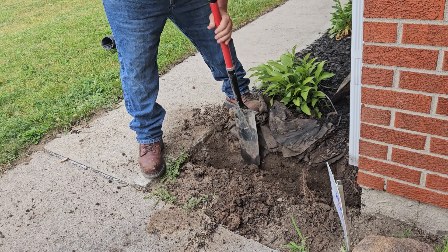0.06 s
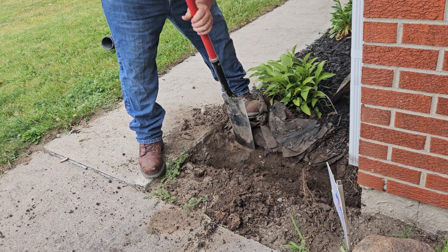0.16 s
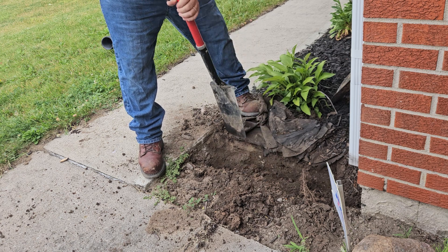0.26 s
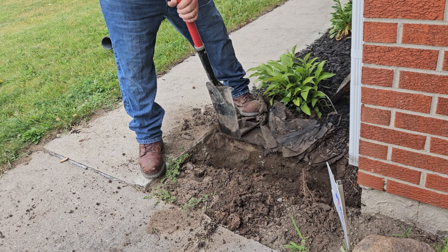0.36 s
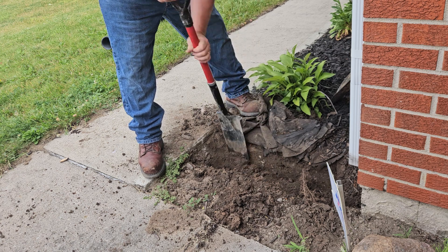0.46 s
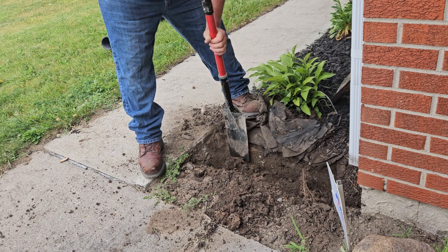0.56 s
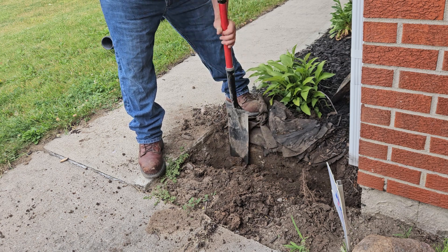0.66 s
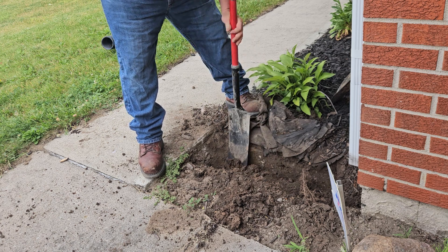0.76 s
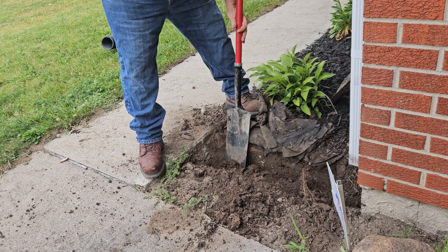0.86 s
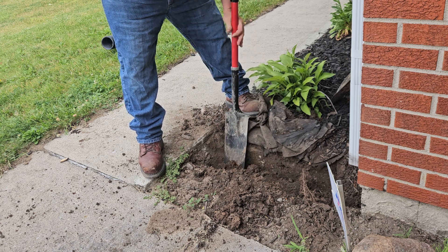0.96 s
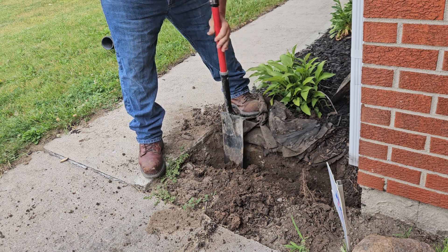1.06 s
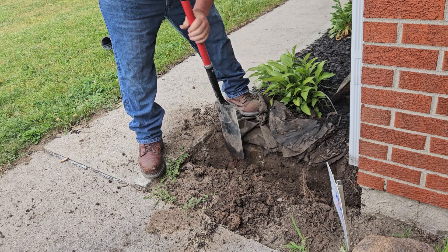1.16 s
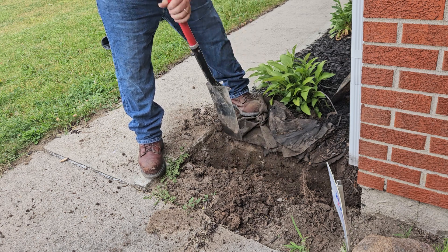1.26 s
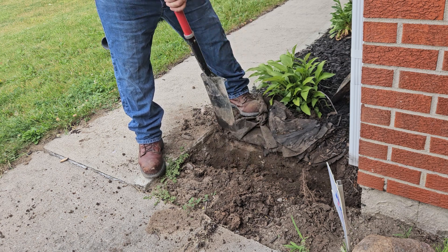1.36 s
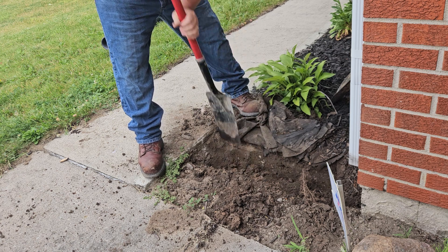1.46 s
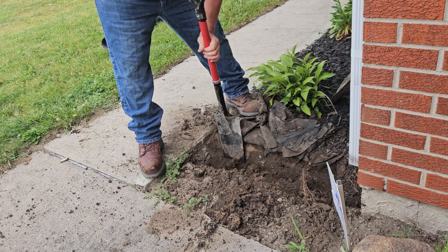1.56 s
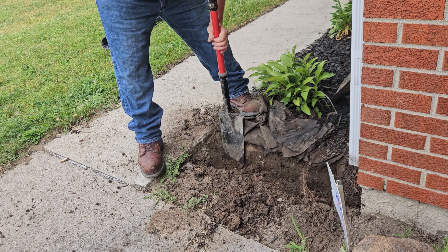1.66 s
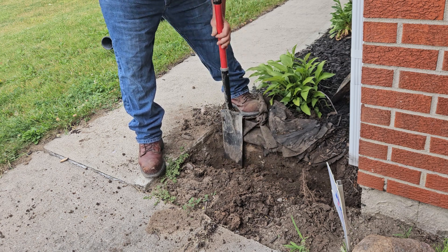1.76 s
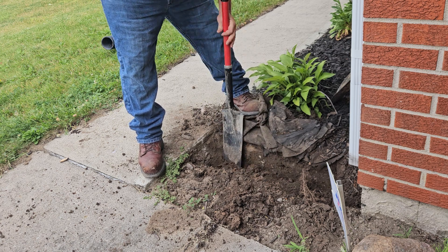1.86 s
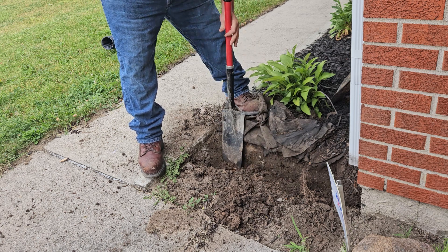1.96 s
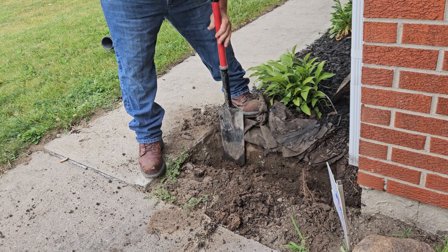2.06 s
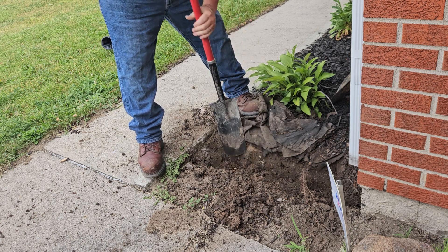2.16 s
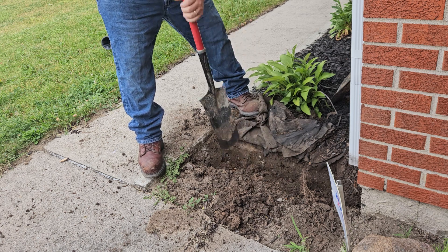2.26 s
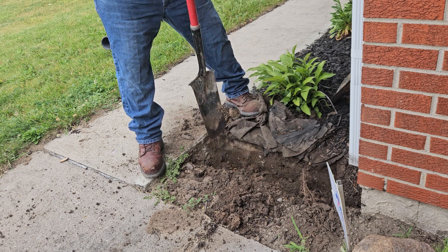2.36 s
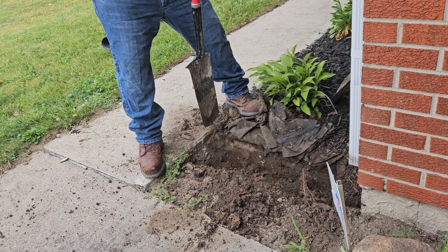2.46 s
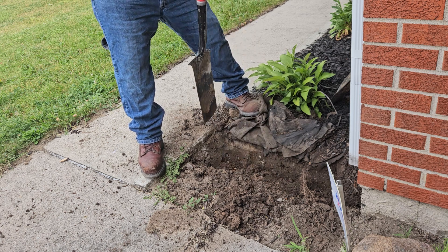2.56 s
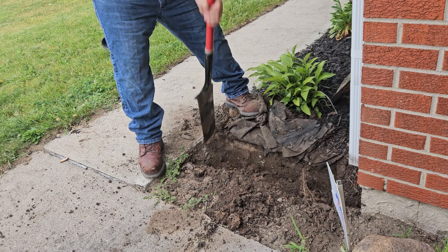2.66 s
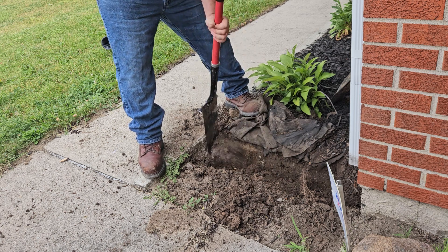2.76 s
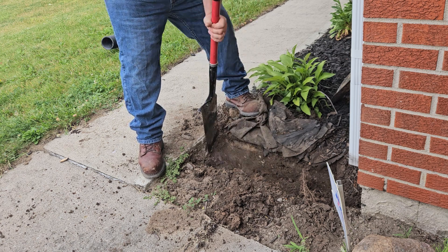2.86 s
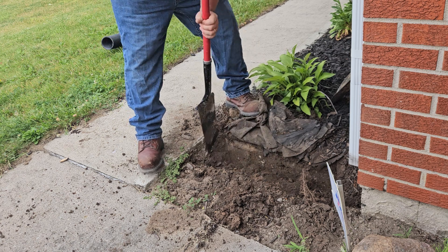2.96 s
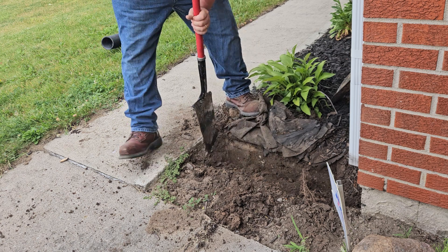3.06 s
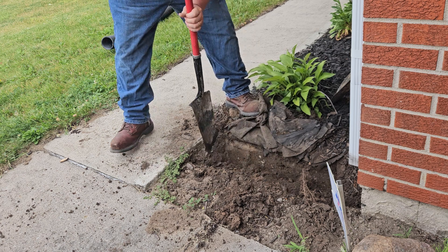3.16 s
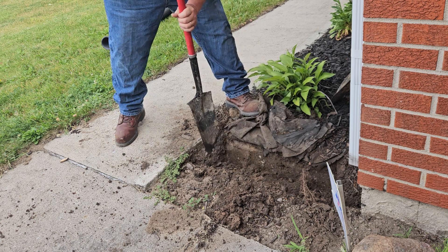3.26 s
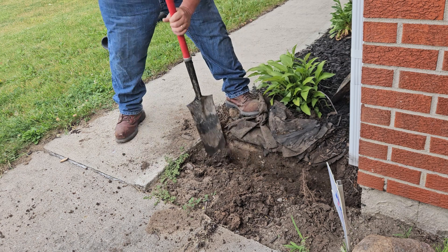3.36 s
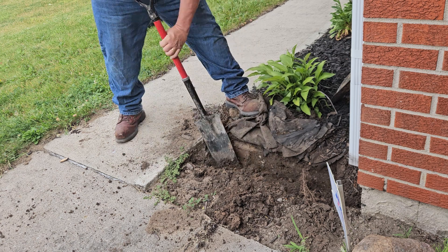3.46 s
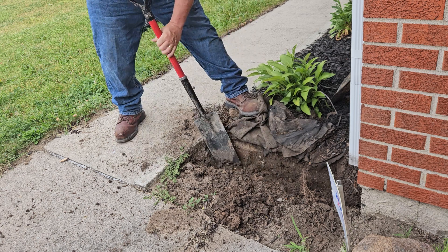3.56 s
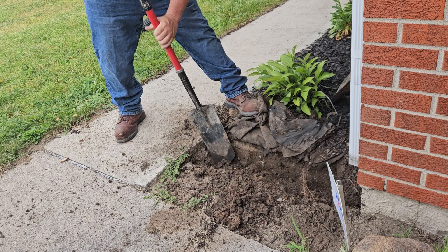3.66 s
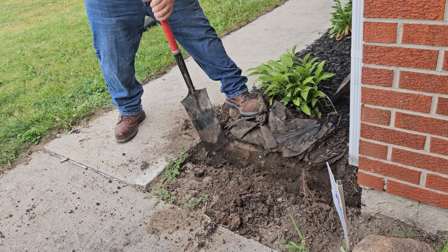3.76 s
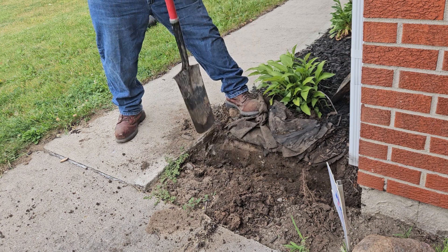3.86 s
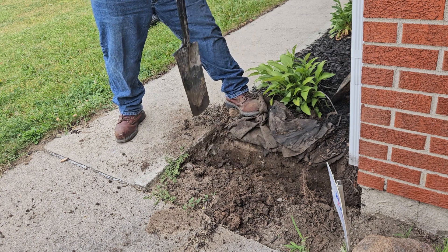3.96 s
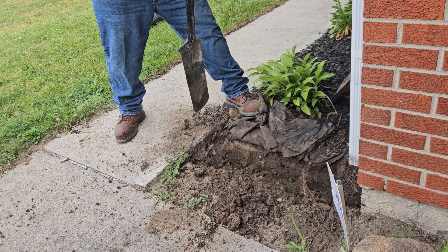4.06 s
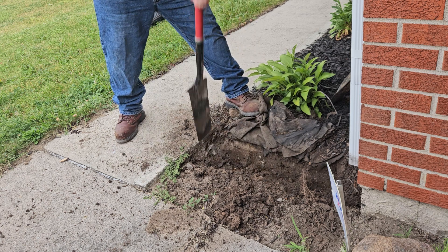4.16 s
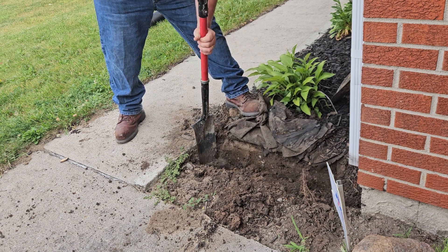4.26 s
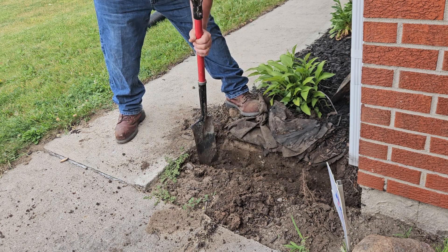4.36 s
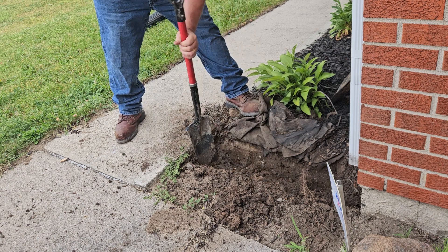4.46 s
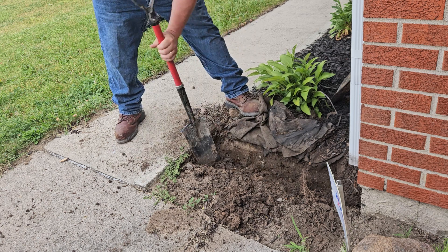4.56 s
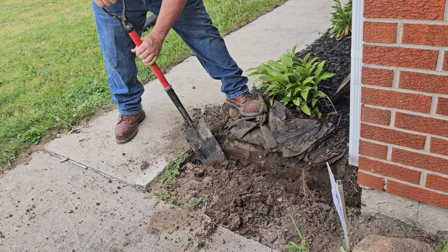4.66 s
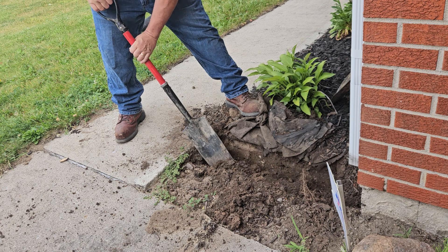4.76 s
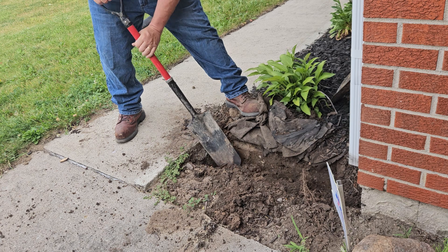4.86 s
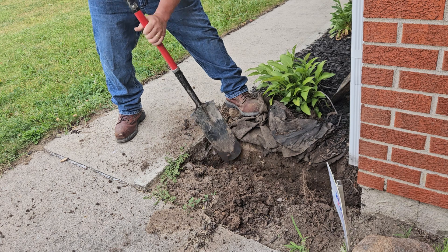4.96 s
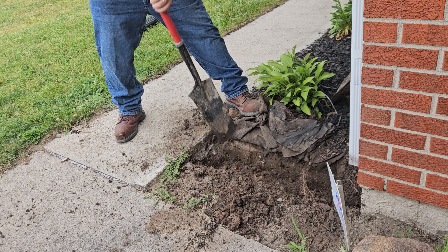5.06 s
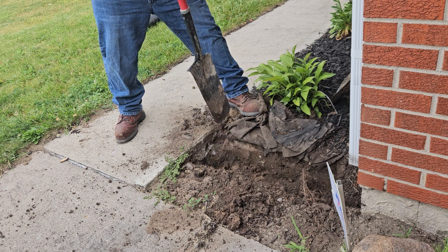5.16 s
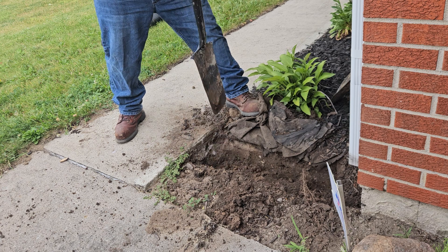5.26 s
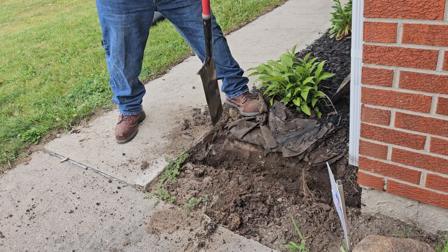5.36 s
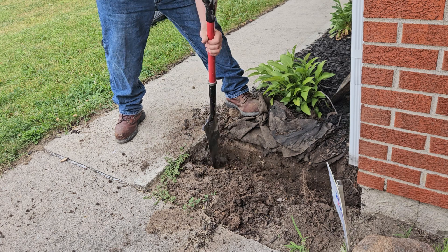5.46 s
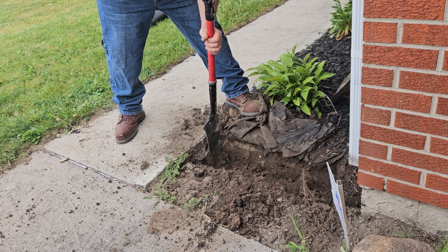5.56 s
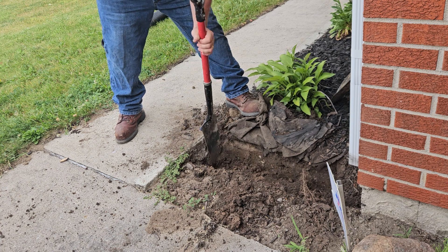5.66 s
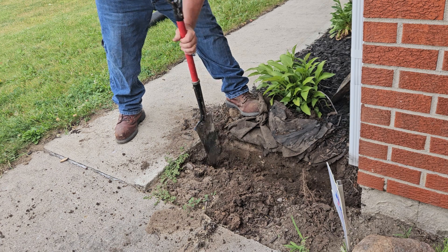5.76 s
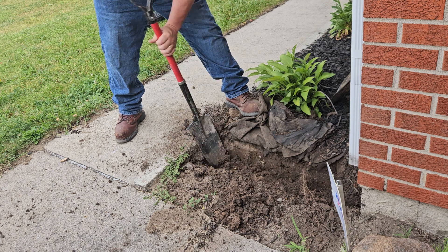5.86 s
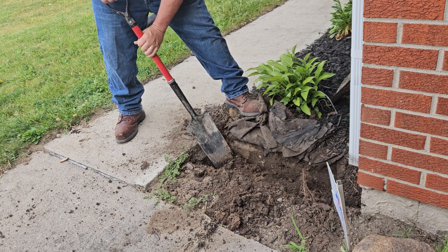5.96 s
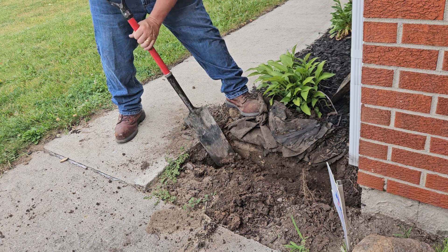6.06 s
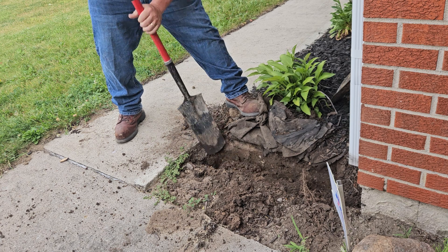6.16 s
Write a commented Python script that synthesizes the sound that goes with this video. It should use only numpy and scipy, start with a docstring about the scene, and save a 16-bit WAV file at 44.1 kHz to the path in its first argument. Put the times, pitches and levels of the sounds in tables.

```python
"""A steel spade is stabbed five times into stony soil beside a concrete path, then pushed and levered.
Friction and fracture send trains of small impulses into soil and steel: grit grinds, stones clink and
excite the blade's modes, clods break and thud, loose sand runs. A boot shifts on the path, and a brick
wall close by reflects these sounds. Behind them are a low outdoor rumble, a faint machine hum, far
traffic and a few distant sparrow chirps."""
import sys
import numpy as np
from scipy import signal
from scipy.fft import rfft, irfft, next_fast_len
from scipy.io import wavfile
from scipy.ndimage import map_coordinates

SR = 44100
rng = np.random.default_rng(int(sys.argv[2]) if len(sys.argv) > 2 else 0)


def transcribe(signal):
    """Save signal, clipped to [-1, 1], as a 16-bit WAV file at the path in sys.argv[1]."""
    frames = np.atleast_2d(signal).T
    limited = np.clip(frames, -1, 1)
    pcm = np.round(limited * 32767).astype(np.int16)
    wavfile.write(sys.argv[1], SR, pcm)


N = 273420

# Background levels over time: time_s, rumble_db, traffic_db
BACKGROUND_LEVELS = [(0, -52, -55), (1.3, -53, -57), (2.501, -54, -59), (3.898, -56.5, -62),
                     (5.198, -59, -67.5), (6.2, -56, -64)]
# Spectra of the outdoor rumble and far traffic: frequency_hz, density_db
RUMBLE_SPECTRUM = [(12, -29), (20, -3.5), (43, 0), (107, -1.5), (140, -9), (198, -4), (222, -14.5),
                   (292, -20), (327, -17), (400, -22), (520, -51), (880, -120)]
TRAFFIC_SPECTRUM = [(150, -3), (400, -4), (950, 3), (1600, 0.5), (3000, -7.5), (5000, -12), (7000, -19),
                    (10000, -38), (13000, -20.5), (16000, -43)]
# Sparrow notes: start_s, length_s, top_hz, arch_depth_hz, level_db
SPARROW_NOTES = [(1.467, 0.27, 5450, 300, -66.5), (2.407, .06, 6700, 600, -66),
                 (2.437, 0.058, 5540, 1890, -50.5), (2.474, 0.024, 4108, 500, -49.5),
                 (2.512, 0.047, 4010, 700, -49.5), (2.526, .035, 5204, 900, -59),
                 (2.585, .04, 3214, 200, -64), (3.784, 0.037, 5300, 1000, -47.5),
                 (3.844, 0.044, 4370, 950, -49.5), (4.176, 0.075, 5700, 2100, -48.5)]
# Reverberation time of the yard: frequency_hz, t60_s
YARD_DECAY = [(150, .15), (1000, .18), (4000, .19), (14000, .17)]
# Colour of the reflected sound: frequency_hz, gain_db
SCATTER_GAIN = [(100, -16), (300, -7.5), (700, 2), (3000, 3), (14000, 4.5)]
# Level difference between two microphone ports: frequency_hz, left_minus_right_db
PORT_BALANCE = [(100, -2.5), (1000, -1), (2000, -1.5), (3700, 3), (5500, -1), (7200, 0), (8500, -8),
                (9700, -14.5), (11700, -3), (13500, -9.5), (15500, -1)]
# Resonances of the steel blade: frequency_hz, bandwidth_hz, gain_db
BLADE_MODES = [(1521, 30, 2.5), (2192, 71, 4), (3126, 34, 4.5), (3674, 100, 0.5), (3970, 150, -5),
               (4720, 67, -3), (5260, 120, -4), (6400, 18, -15), (6410, 45, 2), (6800, 35, -12),
               (7410, 40, 5.5), (11600, 1500, -15.5), (11930, 1900, -12.5), (14100, 61, -20)]
# Contact spectra of struck grit, sliding grit, crumbs, earth and falling lumps: frequency_hz, density_db
STRUCK_GRIT_SPECTRUM = [(1500, -45.5), (2500, -6), (3400, 1.5), (5000, -1), (5900, -4), (7300, 0),
                        (8500, -7), (9800, -13), (12000, -2), (15500, -9.5)]
SLIDING_GRIT_SPECTRUM = [(1500, -37), (2600, -4), (3500, 1), (5000, 0), (5900, -3), (7300, -1),
                         (8800, -4.5), (9700, -16), (11000, -5), (12300, 0.5), (13500, -5.5), (15500, -3.5)]
CRUNCH_SPECTRUM = [(300, -25), (600, -6), (1000, -2), (1400, 3), (2200, -3.5), (3000, -1), (5000, -15),
                   (9000, -38.5)]
THUD_SPECTRUM = [(40, -17.5), (90, -7), (140, 0.5), (200, -2), (290, 0.5), (400, -9.5), (550, -8.5),
                 (1100, -51.5)]
LUMP_SPECTRUM = [(50, -19), (130, 1.5), (220, -3), (350, -4.5), (600, -1.5), (1000, -7), (2000, -37)]
# A boot steps back, heel then sole: start_s, length_s, level_db
BOOT_STEPS = [(3.347, 0.027, -40.5), (3.431, 0.069, -50.5)]
# Levered clods give way: break_s, crunch_db, thud_db
CLOD_BREAKS = [(0.801, -35.5, -49), (0.878, -29.5, -44.5), (1.945, -40, -43.5), (3.321, -44.5, -49),
               (3.466, -25, -40), (3.556, -29, -40.5), (4.632, -41.5, -48), (4.71, -40, -42.5),
               (4.885, -44, -47), (5.963, -32, -31.5)]
# Short slips of the blade through the soil: start_s, length_s, grit_db, crunch_db
BLADE_SLIPS = [(0.0, 0.0047, -45, -56), (0.208, 0.029, -48.5, -55), (0.461, 0.0049, -26, -43.5),
               (0.652, 0.028, -32, -47.5), (0.702, 0.037, -34, -48), (0.755, 0.097, -31, -41.5),
               (0.87, 0.023, -29, -40.5), (1, 0.039, -44, -46.5), (1.125, 0.073, -52.5, -54.5),
               (1.694, 0.013, -37.5, -50), (1.732, 0.05, -30, -46.5), (1.833, 0.028, -32.5, -45.5),
               (1.908, 0.07, -36, -43), (2.205, .011, -28.5, -41.5), (2.237, 0.037, -43.5, -44),
               (3.015, .02, -40, -56), (3.043, 0.052, -36.5, -45), (3.141, 0.0034, -32, -47),
               (3.222, 0.02, -29.5, -44.5), (3.261, 0.12, -38, -50), (3.454, 0.037, -21, -35),
               (3.5, 0.061, -29, -36.5), (3.665, 0.089, -48.5, -58.5), (3.766, 0.035, -49.5, -50),
               (4.512, 0.096, -38.5, -53), (4.628, 0.12, -37, -43.5), (4.825, 0.019, -41, -45.5),
               (4.861, 0.052, -42.5, -46.5), (5.676, 0.0094, -39.5, -54), (5.797, 0.076, -37.5, -53.5),
               (5.913, 0.062, -37.5, -41.5), (5.974, 0.012, -32.5, -43), (6.082, 0.032, -37.5, -47)]
# Stones snap against the steel: start_s, relative_level_db
STONE_HITS = [(0.2185, -31), (0.5443, -21), (0.5582, -8.5), (0.7052, -24.5), (0.839, -30), (1.6046, -7.5),
              (1.8923, -26.5), (1.987, -33), (2.1035, -42.5), (2.7745, -8.5), (2.7834, -2.5), (3.134, -22),
              (3.3204, -25), (3.425, -31), (3.4465, -25), (3.5546, -24), (4.2922, -4), (4.2952, -4),
              (4.308, -9.5), (4.6279, -25.5), (4.6707, -27.5), (5.5399, -6), (5.8973, -32.5),
              (5.9703, -22.5)]
# The blade drives in: start_s, rise_s, travel_s, grit_db, crunch_db, thud_db
SPADE_STABS = [(0.542, 0.0017, 0.019, -17.5, -26, -34), (1.589, 0.02, 0.025, -15, -19, -30),
               (2.774, 0.0024, 0.023, -14.5, -23, -27), (4.292, 0.00088, 0.017, -17, -22, -27.5),
               (5.538, 0.0022, 0.024, -20, -26, -35.5)]


def amp(db):
    """Amplitude ratio of a level in decibels."""
    return 10 ** (np.asarray(db) / 20)


def unit(x):
    """Normalisation to an rms of 1."""
    return x / np.sqrt(np.mean(x ** 2) + 1e-20)


def along(points, hz):
    """Interpolation of (frequency_hz, value) points on a logarithmic frequency axis."""
    knots_hz, values = np.transpose(points)
    return np.interp(np.log(hz + 1), np.log(knots_hz + 1), values)


def wobble(rate, size):
    """Slow random modulation: a spline through `rate` Gaussian knots a second."""
    knots = rng.standard_normal(int(size * rate / SR) + 4)
    return map_coordinates(knots, [np.arange(size) * rate / SR])


def filtered(x, response):
    """Linear filtering: the spectrum of x is multiplied by a frequency response."""
    size = x.shape[-1]
    padded = next_fast_len(size + 8192)
    return irfft(rfft(x, padded) * response(np.fft.rfftfreq(padded, 1 / SR)), padded)[..., :size]


def add(out, start_s, x):
    """Superposition of x on out from start_s."""
    i = max(round(start_s * SR), 0)
    out[:, i:i + x.shape[-1]] += x[..., :N - i]


def wash(spectrum, side_db):
    """Partly coherent stereo noise: a weaker side signal gives a narrower image."""
    mid, side = filtered(rng.standard_normal((2, N)), lambda f: amp(along(spectrum, f)))
    return unit(mid + amp(side_db) * np.array([side, -side]))


def background(hum_hz=197, hum_db=-13):
    """Random modulation makes a near-mono rumble, a machine hum and the wash of far traffic waver."""
    times, *levels = np.transpose(BACKGROUND_LEVELS)
    rumble_gain, traffic_gain = [amp(np.interp(np.arange(N) / SR, times, db)) for db in levels]
    phase = 2 * np.pi * np.cumsum(hum_hz + 3 * wobble(4, N)) / SR
    hum = np.sin(phase) * amp(hum_db + 2 * wobble(2.5, N))
    rumble = wash(RUMBLE_SPECTRUM, side_db=-20.5) * amp(0.49 * wobble(21, N))
    traffic = wash(TRAFFIC_SPECTRUM, side_db=0) * amp(0.85 * wobble(8.8, N))
    return rumble_gain * (rumble + hum) + traffic_gain * traffic


def sparrows(echo_t60_s=0.25, echo_db=-4):
    """Frequency modulation gives each whistle its arch and buzz; reverberation blurs it with distance."""
    out = np.zeros((2, N))
    t = np.arange(SR // 3) / SR
    for start_s, length_s, top_hz, arch_hz, db in SPARROW_NOTES:
        progress = np.linspace(0, 1, int(length_s * SR))
        hz = top_hz - arch_hz * (2 * progress - 1) ** 2
        buzz = min(0.3 * arch_hz / top_hz, 0.06)  # wide sweeps are the buzzy ones
        hz *= 1 + buzz * wobble(700, len(hz))
        envelope = np.sqrt(np.abs(np.sin(np.pi * progress)))
        note = amp(db) * unit(envelope * np.sin(2 * np.pi * np.cumsum(hz) / SR))
        echo = unit(rng.standard_normal((2, len(t))) * amp(-60 * t / echo_t60_s))
        echo *= amp(echo_db) / np.sqrt(len(t))
        echo[:, 0] += 0.35  # direct path
        add(out, start_s, signal.fftconvolve(note[None], echo, axes=1))
    return out


def yard(x, near_db=-4, near_t60_s=0.08, wall_db=-9, wall_s=0.012, wall_width_s=0.0018, tail_db=-9):
    """Multipath propagation: direct sound, scatter from the hole, a wall on the right and a short tail."""
    size = 13230
    t = np.arange(size) / SR

    def burst(shape):
        return rng.standard_normal((2, size)) * shape / np.linalg.norm(shape)
    near = amp(near_db) * burst(amp(-60 * t / near_t60_s))
    wall = amp(wall_db) * amp([[-4], [1]]) * burst(np.exp(-((t - wall_s) / wall_width_s) ** 2 / 2))
    hz, frame_s, noise = signal.stft(rng.standard_normal((2, size)), SR, nperseg=256)
    decay = amp(-60 * frame_s / along(YARD_DECAY, hz)[:, None])
    tail = signal.istft(noise * decay, SR, nperseg=256)[1][:, :size]
    tail *= 1 - np.exp(-t / 0.0019)
    tail *= amp(tail_db) / np.linalg.norm(tail[0])
    reflections = filtered(near + wall + tail, lambda f: amp(along(SCATTER_GAIN, f)))
    paths = np.pad(reflections, ((0, 0), (16, 0)))
    paths[:, :16] += np.sinc(np.arange(16) - 7 - np.array([[1.28], [0]]))  # direct: left lags 1.28 samples
    return signal.fftconvolve(x[None], paths / np.sqrt(np.sum(paths ** 2) / 2), axes=1)


def contact(spectrum, ring_db, size=4096):
    """Impulse response to one grain, of energy 1: the contact's colour with the blade's resonances."""
    f = np.fft.rfftfreq(size, 1 / SR)
    cepstrum = irfft(np.log(amp(along(spectrum, f))))
    cepstrum[1:size // 2] *= 2  # folding the cepstrum gives a causal, minimum-phase response
    cepstrum[size // 2 + 1:] = 0
    steel = sum(amp(db) * 1j * f * width / (hz * hz - f * f + 1j * f * width)
                for hz, width, db in BLADE_MODES)
    response = irfft(np.exp(rfft(cepstrum)) * (1 + amp(ring_db) * steel))
    return response / np.linalg.norm(response)


def radiate(forces, contacts):
    """Convolution: each force sounds through its own contact, and their sum through the yard."""
    return yard(sum(signal.fftconvolve(force, response) for force, response in zip(forces, contacts)))


def grains(size, per_s, spread_db, clump_db=0):
    """Shot noise of rms 1: grains of uneven size break at random times, stronger in clumps."""
    hits = rng.random(size) < per_s / SR
    strength = amp(spread_db * np.clip(rng.standard_normal(size), -2, 2) + clump_db * wobble(260, size))
    return unit(hits * strength * np.sign(rng.standard_normal(size)))


def thrust(rise_s, travel_s, stop_s):
    """Force envelope: a linear rise, a hold during travel, then exponential relaxation."""
    t = np.arange(SR // 6) / SR
    return np.minimum(t / rise_s, 1) * np.exp(-np.maximum(t - travel_s, 0) / stop_s)


def boot():
    """Friction of a rubber sole pressing on the gritty path makes a dull scuff."""
    out = np.zeros((2, N))
    sole = contact(THUD_SPECTRUM, ring_db=-60)
    for start_s, length_s, db in BOOT_STEPS:
        force = amp(db) * thrust(0.0048, length_s, stop_s=0.015)
        add(out, start_s, radiate([force * grains(len(force), per_s=3900, spread_db=1)], [sole]))
    return out


def sand_spill(below_grit_db=36.5, decay_s=0.23):
    """Granular flow: sand loosened by each stab runs down the blade and dies away exponentially."""
    out = np.zeros((2, N))
    blade = contact(SLIDING_GRIT_SPECTRUM, ring_db=-7.5)
    t = np.arange(SR // 2) / SR
    for start_s, _, _, grit_db, _, _ in SPADE_STABS:
        flow = amp(grit_db - below_grit_db) * np.exp(-t / decay_s)
        add(out, start_s, radiate([flow * grains(len(t), per_s=1300, spread_db=3)], [blade]))
    return out


def clods(lead_s=0.06, strain_s=0.0102, crumble_s=0.0061, settle_s=0.0177):
    """Fracture under rising strain: a levered clod cracks ever harder, breaks and settles with a thud."""
    out = np.zeros((2, N))
    contacts = contact(CRUNCH_SPECTRUM, ring_db=-3), contact(LUMP_SPECTRUM, ring_db=-20)
    t = np.arange(SR // 5) / SR - lead_s
    strain = np.exp(np.minimum(t, 0) / strain_s)
    after = np.maximum(t, 0)
    for break_s, crunch_db, thud_db in CLOD_BREAKS:
        cracks = strain * grains(len(t), per_s=1500, spread_db=4, clump_db=1.5)
        crunch = amp(crunch_db) * cracks * np.exp(-after / crumble_s)
        thud = amp(thud_db) * cracks * np.exp(-after / settle_s)
        add(out, break_s - lead_s, radiate([crunch, thud], contacts))
    return out


def scrapes(bite_s=0.0023, sag_db_per_s=31.5, stop_s=0.0098, trickle_db=-17, trickle_s=0.085, bed_db=-17):
    """Sliding friction: at each slip sand hisses, crumbs crunch and trickle on, and the soil bed rumbles."""
    out = np.zeros((2, N))
    contacts = (contact(SLIDING_GRIT_SPECTRUM, ring_db=-3), contact(CRUNCH_SPECTRUM, ring_db=-0.5),
                contact(THUD_SPECTRUM, ring_db=-31))
    t = np.arange(SR // 3) / SR
    for start_s, length_s, grit_db, crunch_db in BLADE_SLIPS:
        after = np.maximum(t - length_s, 0)
        speed = (1 - np.exp(-t / bite_s)) * amp(-sag_db_per_s * t)
        release = np.exp(-after / stop_s) + amp(trickle_db) * np.exp(-after / trickle_s)
        grip = speed * release * unit(amp(2.2 * wobble(150, len(t))))
        sand = grains(len(t), per_s=6000, spread_db=4.5, clump_db=1.5)
        crumbs = grains(len(t), per_s=600, spread_db=6, clump_db=2)
        fine = amp(grit_db) * grip * (amp(-4.5) * sand + amp(-5.5) * crumbs)  # crumbs crackle up here too
        coarse = amp(crunch_db) * grip * crumbs
        add(out, start_s, radiate([fine, coarse, amp(bed_db) * coarse], contacts))
    return out


def stone_clinks(chip_s=0.0026):
    """Impulsive excitation: a stone chips within milliseconds and leaves the blade ringing freely."""
    out = np.zeros((2, N))
    contacts = contact(STRUCK_GRIT_SPECTRUM, ring_db=-8), contact(CRUNCH_SPECTRUM, ring_db=-10)
    t = np.arange(SR // 50) / SR
    for start_s, db in STONE_HITS:
        snap = np.exp(-t / chip_s) * rng.standard_normal(len(t))
        snap *= amp(db + 17.5) / np.linalg.norm(snap)
        add(out, start_s, radiate([snap, amp(-10.5) * snap], contacts))
    return out


def spade_stabs(brake_db_per_s=168, thump_hz=140.1, thump_db=3, thump_t60_s=0.17):
    """Shear and damping: the edge cuts grit, the soil brakes the blade, and the packed earth resonates."""
    out = np.zeros((2, N))
    contacts = (contact(STRUCK_GRIT_SPECTRUM, ring_db=-16), contact(CRUNCH_SPECTRUM, ring_db=-15),
                contact(THUD_SPECTRUM, ring_db=-21.5))
    for start_s, rise_s, travel_s, grit_db, crunch_db, thud_db in SPADE_STABS:
        force = thrust(rise_s, travel_s, stop_s=0.009)
        t = np.arange(len(force)) / SR
        braking = amp(-brake_db_per_s * (np.minimum(t, travel_s) - travel_s / 2))
        sand = force * braking * grains(len(t), per_s=12000, spread_db=2.5, clump_db=-1.5)
        earth = thrust(rise_s, travel_s, stop_s=0.018) * grains(len(t), per_s=5000, spread_db=-1.5)
        forces = amp(grit_db) * sand, amp(crunch_db) * sand, amp(thud_db) * earth
        add(out, start_s, radiate(forces, contacts))
        swell = (1 - np.exp(-t / 0.012)) * amp(thud_db + thump_db - 60 * t / thump_t60_s)
        add(out, start_s, swell * np.sin(2 * np.pi * thump_hz * t))
    return out


def scene(pan_start_db=-0.27, pan_db_per_s=0.23):
    """Superposition of all sources; a changing level difference moves the spade slightly leftward."""
    pan_db = pan_start_db + pan_db_per_s * np.arange(N) / SR
    spade = spade_stabs() + sand_spill() + scrapes() + clods() + stone_clinks()
    return spade * amp([pan_db / 2, -pan_db / 2]) + boot() + sparrows() + background()


def record(dry, top_hz=15950):
    """Transduction: each port colours the sound, saturation rounds the peaks, a low-pass limits the band."""
    coloured = filtered(dry, lambda f: amp(np.array([[0.5], [-0.5]]) * along(PORT_BALANCE, f)))
    rounded = coloured / (1 + coloured ** 6) ** (1 / 6)
    return filtered(rounded, lambda f: 1 / np.sqrt(1 + (f / top_hz) ** 300))


dry = scene()
out = record(dry)
transcribe(out)
```